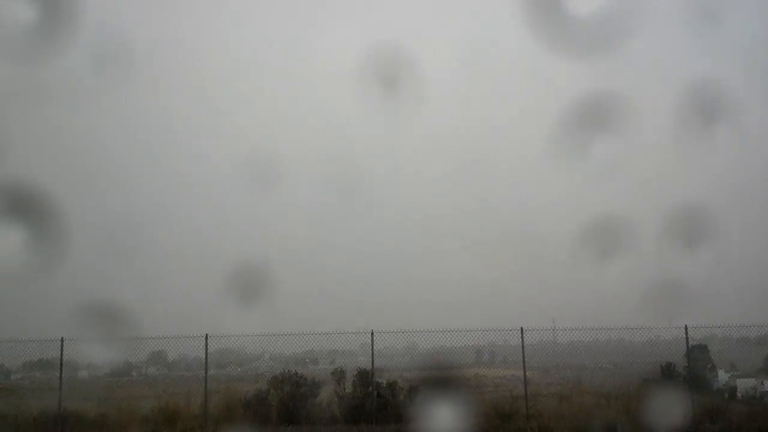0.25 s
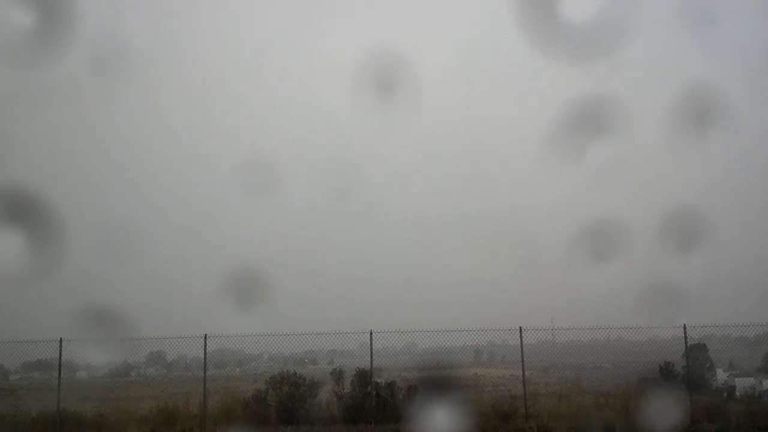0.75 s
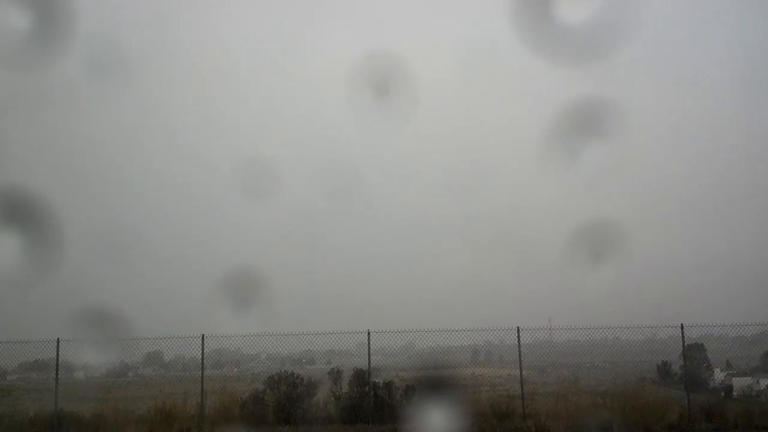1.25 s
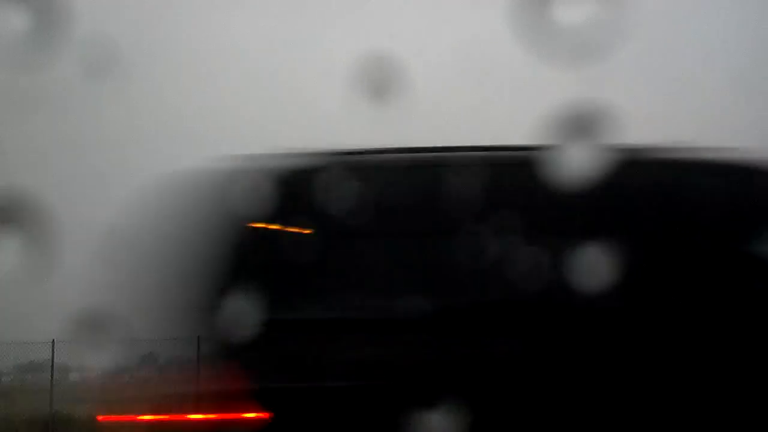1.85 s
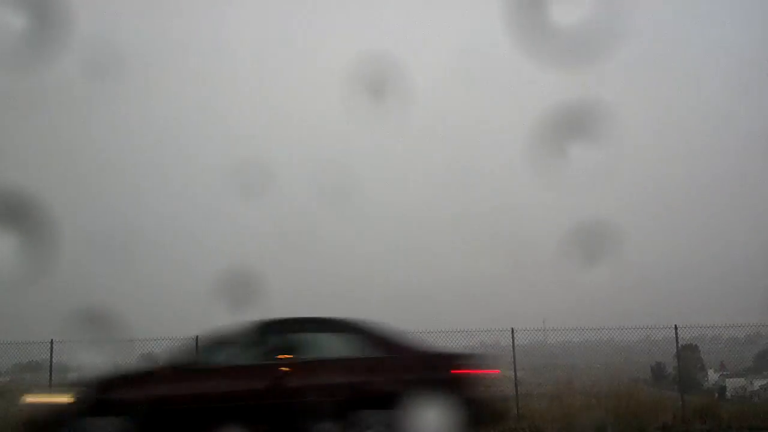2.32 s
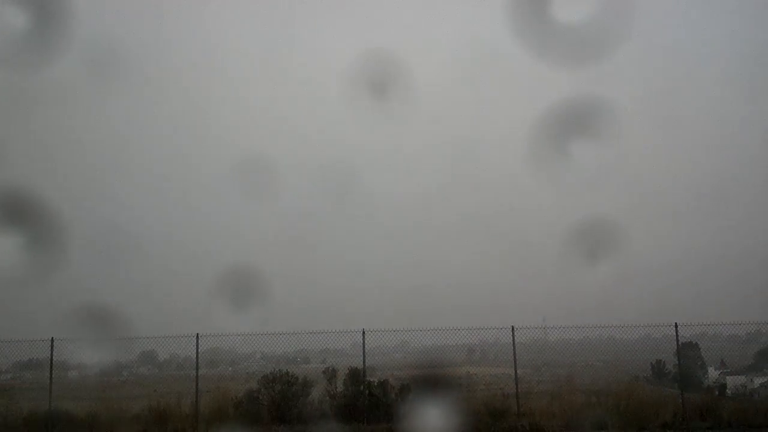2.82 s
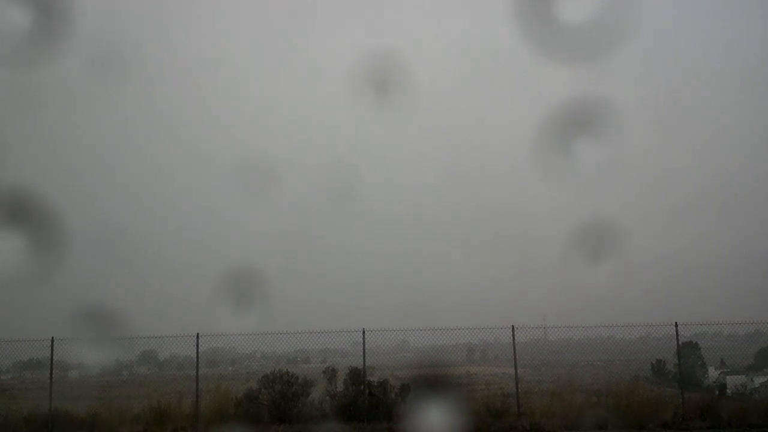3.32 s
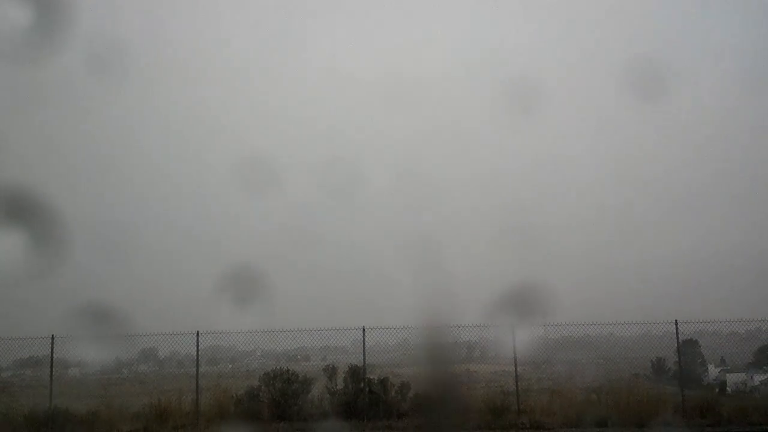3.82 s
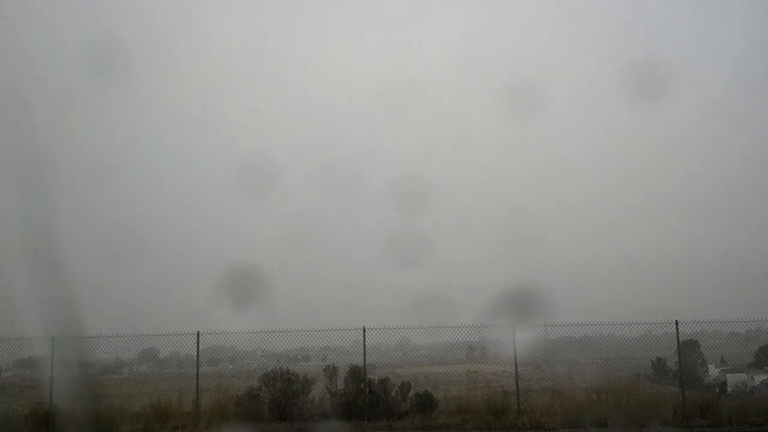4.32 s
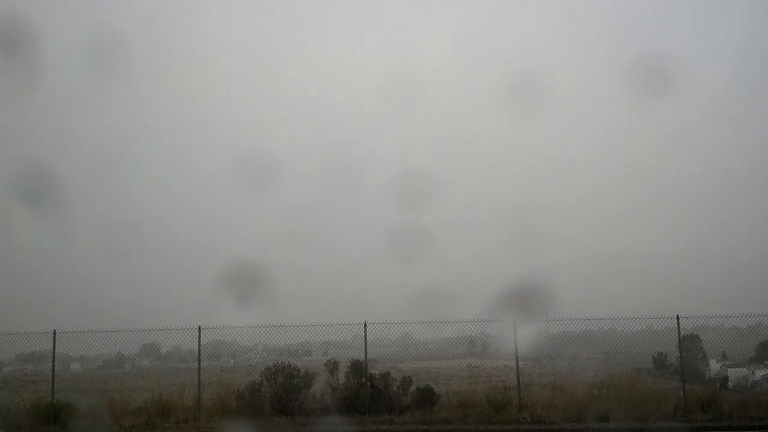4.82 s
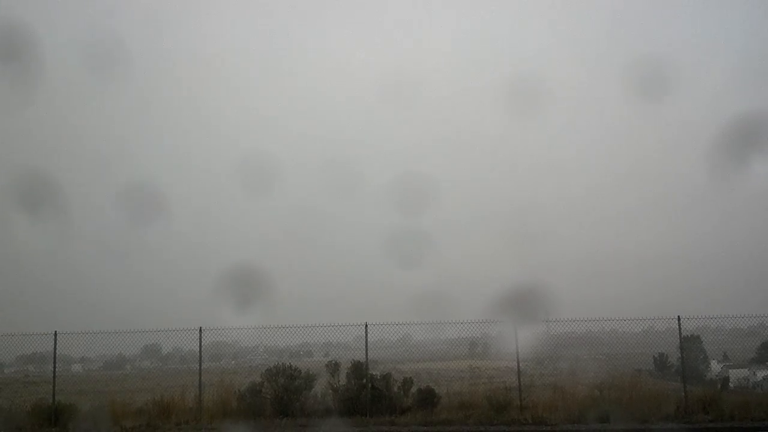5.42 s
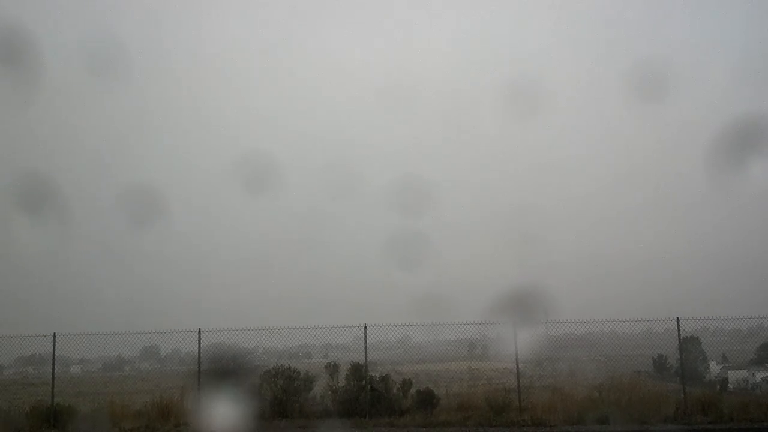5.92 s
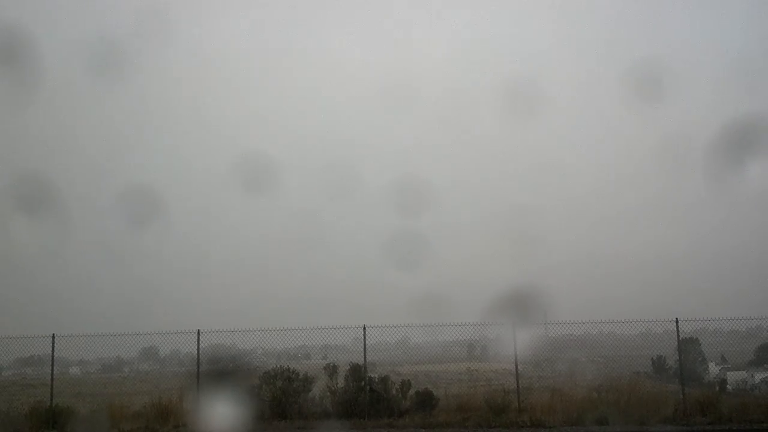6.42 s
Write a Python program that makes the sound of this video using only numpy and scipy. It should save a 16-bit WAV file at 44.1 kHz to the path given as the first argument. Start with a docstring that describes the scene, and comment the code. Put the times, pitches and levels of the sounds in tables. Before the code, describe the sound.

Inside a parked car in heavy rain, a steady dull drumming on the metal roof mixes with crisp patter and fine spray on the window. Many separate fat drops thud, knock and tick, a few smacking very close around three and just after four seconds. One drop makes metal trim ring briefly near one second. At the end a low engine hum passes, sinking in pitch. Close, wide stereo from a small camera.

```python
"""Heavy rain heard from inside a parked car: drops drum on the roof, knock on the window and splash with a tick.
Every drop is filtered noise: a hard push straight from where it lands, then the ring of panel and cabin.
One drop also sets metal trim ringing, made of fading sines; at the end an engine hums past on three sines.
The camera has two close microphone ports. It widens their stereo picture, and its gain control
ducks at fat drops close by and creeps back."""
import sys
import numpy as np
from scipy import signal
from scipy.fft import rfft, irfft, next_fast_len
from scipy.io import wavfile
from scipy.ndimage import uniform_filter1d

SR = 44100
rng = np.random.default_rng(int(sys.argv[2]) if len(sys.argv) > 2 else 0)


def to_wav(sig):
    """Store sig (one row per channel, or 1-D mono) as 16-bit WAV at the path in sys.argv[1].

    Samples outside -1..1 are clipped; the rate is SR.
    """
    pcm = np.clip(np.atleast_2d(sig), -1, 1) * 32767
    pcm = np.round(pcm).astype(np.int16)
    wavfile.write(sys.argv[1], SR, pcm.T)  # frames by channels


N = 293706  # length in samples
TIME = np.arange(N) / SR  # seconds
TOP_HZ = 15800  # the camera passes nothing much above this
PORT_LAG_S = 0.0002  # longest travel time from one port to the other
ROOF_T60_S, PANE_T60_S, SPLASH_T60_S = 0.13, 0.07, 0.041  # time for a ring to fade by 60 dB
WINDOW_FOLLOWS = 0.19  # share of a gust's dB that reaches the glass


def undb(db):
    """Turn decibels into gain."""
    return 10 ** (np.asarray(db) / 20)


def curves(table):
    """Draw straight lines through a timed table: each column at every sample."""
    seconds, *columns = np.transpose(table)
    return [np.interp(TIME, seconds, column) for column in columns]


def unit(x):
    """Scale to a total energy of 1, averaged over the channels."""
    energy = np.sum(x ** 2, axis=-1)
    return x / np.sqrt(np.mean(energy))


def fade(t, t60):
    """A ring dies away exponentially, by 60 dB in t60 seconds."""
    return np.exp(-np.log(1000) * t / t60)


def wander(rate):
    """A random course that heads for a new value this many times a second."""
    return np.interp(TIME * rate, np.arange(1000), rng.standard_normal(1000))


def direction():
    """Where a drop lands, as the lag in seconds between the ports (whole samples)."""
    return np.round(PORT_LAG_S * SR * rng.uniform(-1, 1)) / SR


def colour(points, patchy_db, size=2048):
    """A filter that starts at once and has the given spectrum; every spot of a panel favours other pitches."""
    hz, db = np.transpose(points)
    log_hz = np.log(np.fft.rfftfreq(size, 1 / SR) + 1)
    knots = np.log(np.geomspace(60, TOP_HZ, 36))
    patches = patchy_db * np.interp(log_hz, knots, rng.standard_normal(len(knots)))
    spectrum_db = np.interp(log_hz, np.log(hz), db) + patches
    # Folding the cepstrum gives minimum phase: nothing sounds before the hit.
    cepstrum = irfft(np.log(undb(spectrum_db)))
    cepstrum[1:size // 2] *= 2
    cepstrum[size // 2 + 1:] = 0
    return irfft(np.exp(rfft(cepstrum)))[None]


def blow(body, t60, direct_db, lag, patchy_db=2.5, grit_db=-6, grit_s=0.00075, build=0.023, size=6144):
    """One impact: a single gritty push from one direction, then the ring of panel and cabin builds and fades."""
    t = np.arange(size) / SR
    grit = unit(rng.standard_normal(size) * np.exp(-t / grit_s) * (t > 0))
    push = rfft(unit((t == 0) + undb(grit_db) * grit))

    # The push reaches one port later than the other.
    arrival = np.maximum([[lag], [-lag]], 0)
    direct = irfft(push * np.exp(-2j * np.pi * np.fft.rfftfreq(size, 1 / SR) * arrival))

    swell = (1 - np.exp(-t / (build * t60))) * fade(t, t60)
    ring = unit(rng.standard_normal((2, size)) * swell)
    plain = undb(direct_db) * direct + ring
    return unit(signal.fftconvolve(plain, colour(body, patchy_db), axes=1)[:, :size])


def shower(body, t60, direct_db, rate, scatter_db, count=16, size=800):
    """About `rate` drops of mixed sizes a second fall on a number of spots, each with its own ring; rms 1."""
    out = 0
    for _ in range(count):
        falls = rng.random(size) < rate * TIME[-1] / (count * size)
        sizes = falls * undb(scatter_db * np.minimum(rng.standard_normal(size), 2))
        taps = np.bincount(rng.integers(0, N, size), sizes, N)
        out = out + signal.oaconvolve(taps[None], blow(body, t60, direct_db, direction()), axes=1)[:, :N]
    return unit(out) * np.sqrt(N)


# Strength of the rain, nearly steady until a last gust. Each row: time in seconds, strength in dB.
RAIN = [(0, -2.5), (.6, 0.5), (1.3, -1.5), (1.52, 6), (1.8, -1.5), (2.2, 0), (2.65, -6), (2.95, 4),
        (3.4, 0), (3.95, 2.5), (4.8, -0.5), (5.6, 0), (5.88, 4), (6.66, 4)]
# What a drop sets ringing on the roof. Each row: frequency in Hz, strength in dB per Hz.
ROOF = [(40, -56), (68, -31), (100, -14), (140, -6.5), (200, -0.5), (270, -4), (340, 3.5), (450, -1.5),
        (650, -1.5), (850, -4), (1100, -14.5), (1500, -25), (2500, -22.5), (6000, -54.5)]
# The same for the window pane. Each row: frequency in Hz, strength in dB per Hz.
PANE = [(60, -40), (200, -11), (700, 2), (1200, -0.5), (1550, -0.5), (2000, 2.5), (2450, 1.5), (3100, -1),
        (3800, -8), (4400, -7), (5000, -14.5), (8000, -17.5), (16000, -34)]
# The same for splashing water. Each row: frequency in Hz, strength in dB per Hz.
SPLASH = [(100, -41), (1000, -23.5), (3500, 5), (5300, 1.5), (6800, -0.5), (8500, -5.5), (10000, -2.5),
          (12500, -7.5), (14000, -5), (15700, -3.5), (16500, -27)]


def dense_rain(drumming_db=-34.5, patter_db=-46, spray_db=-53):
    """Countless small drops: dull drumming overhead, crisp patter and fine spray on glass (dB at rain 0 dB)."""
    rain_db, = curves(RAIN)
    drumming = shower(ROOF, ROOF_T60_S, direct_db=-5.5, rate=330, scatter_db=5)
    patter = shower(PANE, PANE_T60_S, direct_db=-6.5, rate=300, scatter_db=9)
    spray = shower(SPLASH, SPLASH_T60_S, direct_db=-12.5, rate=220, scatter_db=7.0)

    roof = drumming * undb(drumming_db + rain_db)
    window = patter * undb(patter_db) + spray * undb(spray_db)
    return roof + window * undb(WINDOW_FOLLOWS * rain_db)


def splash(hz, lag, direct_db, size=6144, count=3):
    """A tick with a short ping in it, then a few droplets that fall back."""
    t = np.arange(size) / SR
    tick = blow(SPLASH, SPLASH_T60_S, direct_db, lag, patchy_db=5.5, grit_db=9, grit_s=0.00072)
    ping_db, ping_t60_s = -6, 0.015
    tone = np.sin(2 * np.pi * hz * t + rng.uniform(0, np.pi, (2, 1)))
    ping = unit(tone * fade(t, ping_t60_s))

    spatter_db, spatter_s = -10.5, 0.02  # level before `far`, time until the last droplet lands
    droplet = blow(SPLASH, SPLASH_T60_S, direct_db=4.0, lag=lag, patchy_db=-2.0)
    landings = (spatter_s * SR * rng.random(count)).astype(int)
    spatter = unit(sum(np.pad(droplet, ((0, 0), (k, 0)))[:, :size] for k in landings))
    far = 1 / np.hypot(1, undb(direct_db))  # a close tick stands further above its spatter
    return unit(tick + undb(ping_db) * ping + undb(spatter_db) * far * spatter)


# Drops that stand out. Each row: start in seconds, level of the thud on the roof in dB, of the knock
# on the glass in dB, of the splash in dB, nearness in dB (direct sound over ring, before each part's
# own offset), pitch of the splash in Hz.
DROPS = [(0.0885, -44, -34.5, -35.5, 0, 3860), (0.1751, -29, -37, -62, 0, 3400.0),
         (0.1924, -42, -30.5, -24, 25, 4070), (0.2326, -41, -31.5, -32.5, 6, 3840),
         (0.2716, -36, -31.5, -43, -12, 4140), (0.4297, -27, -34.5, -34.5, 2, 4220),
         (0.5143, -33, -41, -39, -3, 3740), (0.5627, -45, -45, -47, 0, 3330),
         (0.655, -25, -41, -44, -5, 15000), (0.6924, -29, -36, -55, 0, 4100.0),
         (0.7126, -32, -41, -53, -2, 4100.0), (0.7464, -43, -39, -36, -2, 6800),
         (0.8282, -27, -32, -34.5, 0, 6800), (0.8507, -33, -44, -36.5, -16, 3800.0),
         (0.8766, -29.5, -38, -36, 2, 3870), (0.9065, -33, -36, -44, -7, 5500.0),
         (0.931, -19, -45, -39, -2, 14800.0), (0.962, -38, -56, -60, -12, 3400.0),
         (1.0329, -23, -27, -34, -1, 14900), (1.0558, -26, -40, -59, 5, 3400.0),
         (1.0847, -45, -41, -44, 3, 3400.0), (1.1058, -45, -49, -42.5, -10, 10700.0),
         (1.1605, -44, -42, -56, -5, 3400.0), (1.1761, -31.5, -31, -36, -3, 3760),
         (1.1908, -32, -37, -42, 1, 4100.0), (1.28, -24, -51, -42.5, -5, 4500.0),
         (1.3158, -27, -28, -36, 3.5, 3770), (1.4109, -38, -43, -44, -6, 3800.0),
         (1.4378, -23, -30.5, -58, -12, 3400.0), (1.4709, -46, -35, -34.5, -4, 4400),
         (1.5138, -20, -35, -55, -12, 15200.0), (1.5469, -20.5, -27.5, -31.5, -2, 3770),
         (1.655, -45, -41, -38.5, -7, 4470), (1.6818, -47, -34, -33.5, -3, 4400),
         (1.6919, -43, -34.5, -27, 1, 14100.0), (1.8888, -27.5, -31.5, -34, 7, 15400),
         (1.916, -33.5, -33, -40, 9, 3800.0), (1.9774, -38, -35, -37, -1, 4120),
         (2.0132, -33, -41, -47, -2, 3400.0), (2.0578, -22, -35.5, -36, -15, 3400.0),
         (2.137, -46, -55, -41, -5, 4140), (2.152, -34, -46, -47, 1, 4430),
         (2.1712, -28.5, -27.5, -35, 7, 3880), (2.313, -29, -35, -40, 1, 15200.0),
         (2.3529, -32.5, -50, -38.5, 4, 4500.0), (2.446, -28, -48, -37, -9, 3280),
         (2.4841, -30, -39, -41, 2, 3800.0), (2.4978, -33, -34, -45, -9, 3800.0),
         (2.5135, -18.5, -24, -23, 7.5, 14100.0), (2.5619, -18.5, -30, -27.5, 2, 10000.0),
         (2.6084, -33, -27.5, -41, 9, 4070), (2.6533, -22.5, -34, -42, -4.5, 4130),
         (2.6966, -29, -33.5, -40, -6, 3800.0), (2.7985, -21.5, -35.5, -56, -5, 3400.0),
         (2.8421, -31, -33, -40, -1, 4080), (2.9241, -19, -21, -12.5, 6, 14250),
         (3.091, -22.5, -41, -53, 2, 14800.0), (3.3367, -33, -32, -35.5, -7, 4030),
         (3.423, -40, -49, -36, 4, 4170), (3.4474, -22, -40, -28, 2.5, 7400),
         (3.5316, -37, -28.5, -31.5, -5, 4540), (3.5768, -34, -27.5, -51, -4, 3610),
         (3.6081, -31, -29.5, -37, 0, 4200), (3.6589, -49, -35, -39, 3, 3800.0),
         (3.6951, -27.5, -29.5, -31, 1, 4470), (3.7323, -42, -34, -37, -3, 3510),
         (3.7975, -27, -26.5, -33, -5, 4450), (3.8082, -28, -31, -32, 2, 4460),
         (3.8441, -31.5, -30.5, -27, 9, 3800.0), (3.9128, -20.5, -36, -35, -20, 13700),
         (4.0733, -39, -25.5, -40, -1.5, 4200), (4.1421, -36, -34, -30.5, -5, 8000),
         (4.2247, -23, -19, -14.5, 10.5, 7520), (4.4601, -23.5, -37, -38, -16, 15000),
         (4.6826, -47, -38, -42, 27, 3650), (4.7318, -17.5, -32, -46, -5.5, 15200.0),
         (4.845, -36, -42, -43.5, 1, 4240), (4.9313, -22, -33, -44, -7, 3780),
         (5.0695, -43, -32.5, -35.5, -7, 3900), (5.1447, -27.5, -40, -50, -11, 3400.0),
         (5.2251, -31.5, -34, -35, 10, 4400), (5.276, -30, -38, -43, 0, 5200.0),
         (5.3782, -24, -37.5, -49.5, -9, 3400.0), (5.4238, -30, -34, -51, 2, 4200),
         (5.4792, -39, -35, -43, -10, 4100.0), (5.5402, -33, -42, -40.5, 6, 4000),
         (5.5416, -25, -36.5, -61, -3, 4100.0), (5.7439, -24.5, -34, -35.5, 2.5, 4630),
         (5.809, -31, -37, -42, -4, 4040), (5.8407, -24, -33.5, -46, -8, 4500.0),
         (5.8589, -23, -30.5, -34.5, 2, 4150), (5.9154, -26, -35.5, -35, 5, 4570),
         (5.992, -20, -48, -49, -1, 4060), (6.032, -44, -56, -38, -8, 12900),
         (6.0646, -34, -43, -32.5, -8, 14800.0), (6.0816, -26, -33.5, -38.5, -8, 4070),
         (6.116, -36, -40, -38, 6, 6900.0), (6.1863, -26, -26, -34.5, 1, 4400),
         (6.213, -17, -44, -45, -5, 14800.0), (6.3626, -35, -33.5, -39, -3, 3780),
         (6.3834, -31, -33, -46, 4, 4100.0), (6.4111, -19, -30, -54, -6, 4100.0),
         (6.4492, -25, -31.5, -37.5, 5, 10720), (6.5856, -27, -28, -43, 9, 4400),
         (6.6245, -28, -32.5, -43.5, 1, 3400.0)]


def big_drops(drops):
    """Each drop thuds, knocks and splashes at once from one spot; near ones are a hard push with little ring."""
    out = np.zeros((2, N + SR))
    spread = np.sqrt(SR / 100)  # makes the levels count as rms over 10 ms
    for start_s, thud_db, knock_db, splash_db, near_db, hz in drops:
        lag = direction()
        thud = blow(ROOF, ROOF_T60_S, direct_db=near_db - 5.5, lag=lag, grit_db=-16.5)
        knock = blow(PANE, PANE_T60_S, direct_db=near_db - 0.5, lag=lag, grit_db=1.5, grit_s=0.00082)
        water = splash(hz, lag, direct_db=near_db - 1.0)
        hit = undb(thud_db) * thud + undb(knock_db) * knock + undb(splash_db) * water
        start = int(start_s * SR)
        out[:, start:start + hit.shape[1]] += spread * hit
    return out[:, :N]


def stray_drops(per_s=9, near_db=0.0, low_hz=3300, high_hz=8900, count=200):
    """Middling drops at random moments, a little louder in a gust: rows like those of DROPS."""
    chance = rng.random((count, 5))
    start_s = np.cumsum(-np.log(1 - chance[:, 0])) / per_s
    gust_db = WINDOW_FOLLOWS * np.interp(start_s, *np.transpose(RAIN))
    middle_db = np.array([-42, -47.5, -52])  # thud, knock, splash
    spread_db = 2 * (2 * chance[:, 1:4] - 1)  # up to 2 dB either way
    levels_db = middle_db + spread_db + gust_db[:, None]
    hz = low_hz * (high_hz / low_hz) ** chance[:, 4]
    rows = np.column_stack([start_s, levels_db, np.full(count, near_db), hz])
    return rows[start_s < TIME[-1]]


# Notes of a piece of metal trim. Each row: frequency in Hz, level in dB against the trim's overall
# level, time to fade by 60 dB in seconds.
TRIM = [(865, 4, 0.24), (1500, -18, .3), (1920, -18, .26)]


def trim(start_s=1.033, level_db=-29.5):
    """One drop sets metal trim ringing: a few pure notes that start together and fade."""
    t = np.maximum(TIME - start_s, 0)
    return sum(undb(level_db + db) * np.sin(2 * np.pi * hz * t) * fade(t, t60) for hz, db, t60 in TRIM)


# The passing engine. Each row: time in seconds, firing rate in Hz, level of the firing note in dB.
ENGINE = [(5.75, 117, -60), (6.1, 116, -57), (6.3, 112.5, -41.5), (6.43, 108.7, -44), (6.52, 97.8, -42),
          (6.66, 90.3, -40)]


def engine(waver_db=4.0, rough=0.017, second_db=-5, third_db=-3, fade_s=0.2):
    """Only the firing note and two overtones get through the closed car; the pitch sinks as it goes by."""
    hz, db = curves(ENGINE)
    uneven_hz = hz * (1 + rough * wander(40.2))
    # The two ports hear the hum a little out of step.
    phase = 2 * np.pi * np.cumsum(uneven_hz) / SR + np.array([[0], [1.2]])
    note = 0
    for k, partial_db in enumerate((0, second_db, third_db), 1):
        note = note + np.sin(k * phase) * undb(partial_db + waver_db * wander(20))
    fade_in = np.clip((TIME - ENGINE[0][0]) / fade_s, 0, 1)
    return np.sqrt(2) * note * fade_in * undb(db)


def scene():
    """Rain and engine as they reach the two ports."""
    return dense_rain() + big_drops(DROPS) + big_drops(stray_drops()) + trim() + engine()


def widen(ports, side_cross=0.75, apart_hz=1100, mismatch_hz=80, shadow=0.66, shadow_hz=750,
          shelf_hz=700, bass_hz=80, left_db=-0.47):
    """Each channel has a delayed copy of the other taken off; a shelf restores the bass that this cancels."""
    size = next_fast_len(N + SR // 10)
    hz = np.fft.rfftfreq(size, 1 / SR)
    left, right = rfft(ports, size)
    echo = np.exp(-2j * np.pi * hz * 16 / SR)  # 16 samples late
    unlike = (1j * hz + mismatch_hz) / (1j * hz + apart_hz)  # long waves reach both ports nearly alike
    shaded = shadow * hz / np.hypot(hz, shadow_hz)  # the left port is turned away: short waves feel it most

    common = (left + right) / 2
    difference = (left - right) / 2 * unlike - common * shaded
    mid = common * (1 - 0.985 * echo)
    side = difference * (1 + side_cross * echo)
    shelf = (1j * hz + shelf_hz) / (1j * hz + bass_hz)
    stereo = np.array([(mid + side) * undb(left_db), mid - side])
    return irfft(stereo * shelf / np.sqrt(2), size)[:, :N]


def gain_control(x, limit_db=-19, release_db_per_s=10, sense_hz=2000):
    """The gain drops at once when a millisecond of treble is too loud, then creeps back at a steady rate."""
    treble = signal.sosfilt(signal.butter(2, sense_hz, "high", fs=SR, output="sos"), x)
    power = uniform_filter1d(np.mean(treble ** 2, axis=0), SR // 1000)
    over_db = np.maximum(10 * np.log10(np.maximum(power, 1e-12)) - limit_db, 0)
    recovery_db = release_db_per_s * TIME
    # The strongest cut so far holds, less what has been given back since.
    cut_db = np.maximum.accumulate(over_db + recovery_db) - recovery_db
    return x * undb(-cut_db)


def record(dry):
    """The camera widens the stereo, rides the gain and cuts the top."""
    level = gain_control(widen(dry))
    return signal.sosfilt(signal.ellip(8, 0.2, 70, TOP_HZ, fs=SR, output="sos"), level)


dry = scene()
out = record(dry)
to_wav(out)
```